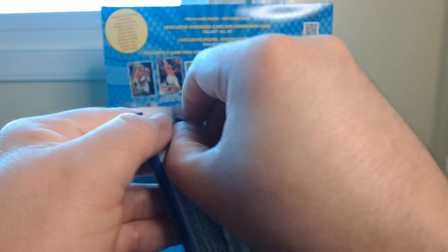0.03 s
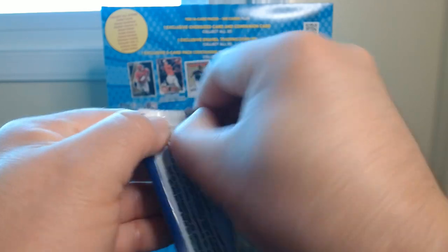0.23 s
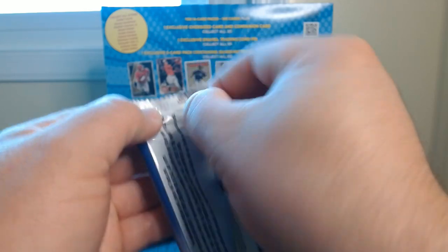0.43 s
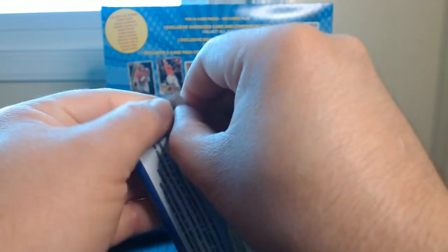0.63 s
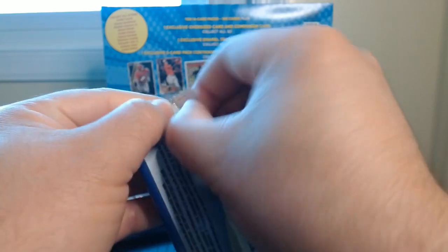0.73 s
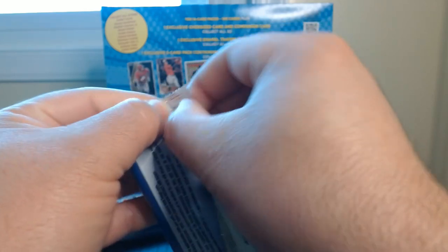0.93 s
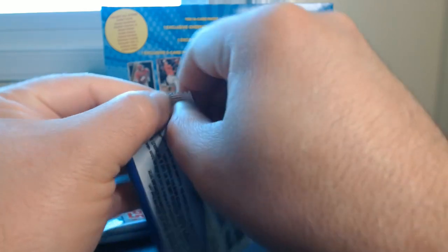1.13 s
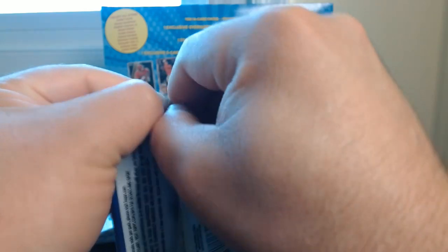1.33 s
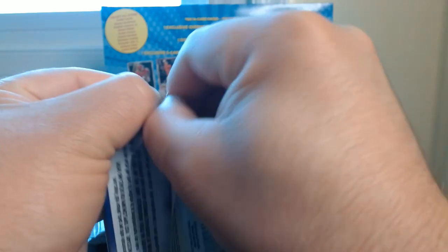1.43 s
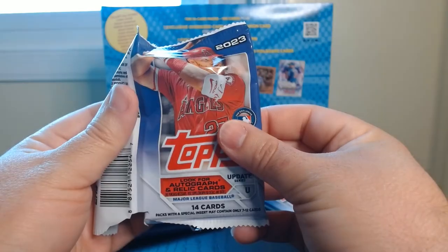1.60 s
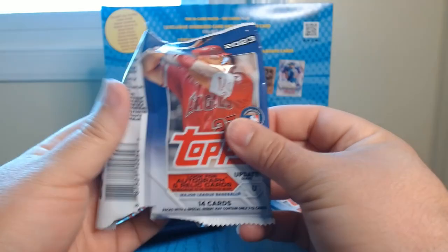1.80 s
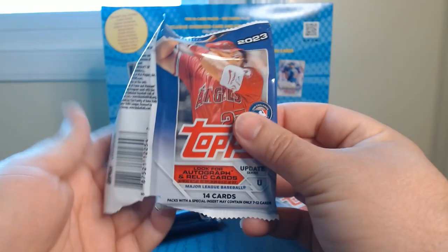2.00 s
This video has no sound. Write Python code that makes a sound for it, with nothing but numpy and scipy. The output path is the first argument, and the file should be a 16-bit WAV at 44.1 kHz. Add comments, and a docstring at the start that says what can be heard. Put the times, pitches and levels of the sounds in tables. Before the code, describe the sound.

A thin foil-plastic packet is pulled open by hand, with sharp irregular crackles, fine crinkling and tiny rips, soft low bumps, a sudden short silence, then another snap and rustle, close to the microphone in a small room.

```python
"""Two hands pull open the foil-plastic wrapper of a card pack, close to a mono microphone in a small room.
From the start the film snaps in short bursts of noise, over a crinkle of random ticks and three short rips;
low modes ring as the fingers bump the pack, most strongly late in the pull. Near 1.5 s the sound drops out
abruptly for 0.2 s. Then the opened wrapper snaps again and rustles as filtered noise, two thin sine tones
squeak, and a last crack rings. The room adds a noise tail and an echo; coloured noise rumbles below."""
import sys
import numpy as np
from scipy import signal
from scipy.fft import rfft, irfft
from scipy.io import wavfile
from scipy.ndimage import uniform_filter1d

SR = 44100
rng = np.random.default_rng(int(sys.argv[2]) if len(sys.argv) > 2 else 0)


def generate_wav(signal):
    """Clip the signal to [-1, 1] and save it as 16-bit WAV at the path in sys.argv[1]."""
    frames = np.transpose(np.atleast_2d(signal))
    scaled = np.clip(frames, -1, 1) * 32767
    pcm = np.round(scaled).astype(np.int16)
    wavfile.write(sys.argv[1], SR, pcm)


N = 90537
TIME = np.arange(N) / SR


def amp(db):
    """Decibels to gain."""
    return 10 ** (np.asarray(db) / 20)


def unit(x):
    """Scale to rms 1."""
    return x / np.sqrt(np.mean(x ** 2) + 1e-30)


def gain_over_time(points):
    """Gain over time, interpolated in dB from (s, dB) points."""
    seconds, db = np.array(points).T
    return amp(np.interp(TIME, seconds, db))


def at_hz(points, hz):
    """Read (Hz, value) points on a log-frequency axis."""
    point_hz, values = np.array(points).T
    return np.interp(np.log(np.maximum(hz, 1)), np.log(point_hz), values)


def colour(x, points):
    """Filter by (Hz, dB) points."""
    size = 2 * len(x)
    gain = amp(at_hz(points, np.fft.rfftfreq(size, 1 / SR)))
    return irfft(rfft(x, size) * gain)[:len(x)]


def above(f, edge_hz, order=14):
    """Gain of a steep high-pass."""
    ratio = (f / edge_hz) ** order
    return np.sqrt(ratio / (1 + ratio))


def decay(t, t60):
    """Exponential decay by 60 dB in t60 seconds."""
    return np.exp(-np.log(1000) * t / t60)


LOW_EDGE_HZ, BODY_EDGE_HZ, TREBLE_EDGE_HZ = 1910, 3720, 7360  # splits into low push, body, ring, edge
SNAP_TRIM_DB, BODY_TRIM_DB, EDGE_TRIM_DB = -27, 0.5, 0.5  # added to the levels in the table of snaps
LOW_DB = -5.5  # low push of a snap, added to its tabled body level
SNAP_RISE_S, SNAP_FALL_S, EDGE_LEAD_S = 0.0011, 0.0022, 0.0007  # the edge cracks first, then the sheet rings
SNAP_ROUGHNESS = 0.61  # unevenness of the fractures within a snap
RING_WIDTH_HZ, RING_DB = 1300, 6
# Colour of the film, heard close up. Each row: frequency in Hz, gain in dB.
FILM_COLOUR = [(40, -8), (280, -9), (600, -8.5), (950, -9.5), (1400, -6.5), (1950, -3), (2500, -4.5),
               (3600, 1), (6000, -0.5), (10000, -0.5), (16000, -2)]
# Snaps of the film. Each row: time in seconds, ring level in dB before the trim, ring pitch in Hz,
# body against ring in dB before its trim, treble edge against ring in dB before its trim.
FILM_SNAPS = [(0.0121,-30.5,7200,-6,4), (0.0325,-42,5900,3,-11), (0.1017,-38.5,5600,1.5,7),
              (0.111,-30.5,4300,-7.5,-5), (0.1555,-26,6600,-15.5,-2), (0.1735,-34.5,5030,2.5,8),
              (0.178,-26.5,4060,-12,-9), (0.1919,-29.5,3850,-5.5,4.5), (0.2048,-25.5,4250,-17,-6),
              (0.215,-19,3520,-7.5,-14), (0.2374,-27.5,3800,-20,-26), (0.278,-32.5,5200,-1.5,1),
              (0.2911,-22,4500,-19,0.5), (0.3,-33,4430,-8,-1), (0.3054,-22.5,4600,-9,3),
              (0.3188,-50,6150,-9,15), (.396,-29,4800,-12,-6), (0.4237,-41.5,6000,-19,12),
              (0.458,-19,5400,-11.5,-0.5), (.472,-35.5,4800,2,0), (0.565,-31,4400,-6.5,5),
              (0.58,-32.5,4770,0,10), (0.582,-22.5,4140,-9.5,1), (0.698,-23,5140,-8.5,0),
              (0.7542,-37.5,4400,-10,-9), (0.767,-36,4130,-6,0), (0.838,-44,5100,-8.5,-7),
              (0.9137,-41,6500,-9.5,6), (0.981,-31,4200,-6.5,0.5), (0.9867,-27,6700,-22.5,0),
              (0.9994,-51,6200,-18,18), (1.0301,-34.5,5100,-21,0), (1.1878,-58.5,6400,-10,13),
              (1.215,-62,5730,-3,13.5), (1.236,-59.5,6500,-8.5,8.5), (1.2676,-42.5,6000,-8,10),
              (1.316,-29.5,5500,-14,7.5), (1.3781,-33,5600,-9,4), (1.3975,-39.5,6500,-6,15),
              (1.408,-26,5430,-8,5), (1.417,-28,5230,-7,-7.5), (1.457,-33.5,5540,-20.5,-5),
              (1.4932,-20,4000,-15.5,-15), (1.4997,-21.5,4150,-8,-3.5), (1.604,-70,3430,-4.5,-10.5),
              (1.655,-74,3670,-9,-4.5), (1.702,-47,4460,-14.5,-10), (1.7194,-23.5,3570,-10,-3),
              (1.8466,-41,4050,-16,-7.5), (2.0487,-19.5,3700,-8.5,-4)]


def snaps(ringing):
    """Each buckle is a run of tiny fractures, a few milliseconds long, that rings one facet of the film."""
    size = 1024
    t = (np.arange(size) - size // 4) / SR
    f = np.fft.rfftfreq(size, 1 / SR)
    film = amp(at_hz(FILM_COLOUR, f))
    above_low, above_body, edge_band = (above(f, hz) for hz in (LOW_EDGE_HZ, BODY_EDGE_HZ, TREBLE_EDGE_HZ))
    low_band = np.sqrt(1 - above_low ** 2)
    body_band = above_low * np.sqrt(1 - above_body ** 2)
    ring_band = above_body * np.sqrt(1 - edge_band ** 2)

    def part(fractures, band, u):
        """One band of a snap, swelling and fading around u = 0."""
        burst = np.exp(-(u / np.where(u < 0, SNAP_RISE_S, SNAP_FALL_S)) ** 2)
        return unit(irfft(rfft(fractures * burst) * film * band))

    out = np.zeros(N + 2 * size)
    for when, db, ring_hz, body_db, edge_db in FILM_SNAPS:
        noise, unevenness = rng.standard_normal((2, size))
        fractures = noise * np.exp(SNAP_ROUGHNESS * unevenness)
        resonance = 1 + ringing / (1 + 2j * (f - ring_hz) / RING_WIDTH_HZ)
        snap = part(fractures, ring_band * resonance, t)
        snap += amp(body_db + BODY_TRIM_DB) * part(fractures, body_band, t)
        snap += amp(body_db + LOW_DB) * part(fractures, low_band, t)
        snap += amp(edge_db + EDGE_TRIM_DB) * part(fractures, edge_band, t + EDGE_LEAD_S)
        start = int(np.clip(when * SR, 0, N))
        # the level sets the energy of the ring, as if spread over one second
        out[start:start + size] += amp(db + SNAP_TRIM_DB) * np.sqrt(SR / size) * snap
    return out[size // 4:size // 4 + N]


RIP_FRACTURES_PER_S, RIP_RING_HZ, RIP_FLANK_DB = 12000, 4370, -18.5
# Short rips, where the seam parts fibre by fibre. Each row: start in seconds, length in seconds,
# level at the start in dB, top treble against the ring in dB.
SEAM_RIPS = [(0.3947, 0.023, -28.5, -6.5), (0.914, 0.041, -43.5, -1.5), (1.113, 0.028, -49.5, 20.5)]


def rips():
    """A dense run of tiny fractures starts at once and fades out as the rip stops."""
    out = np.zeros(N)
    for start, length, db, treble_db in SEAM_RIPS:
        fractures = (rng.random(N) < RIP_FRACTURES_PER_S / SR) * rng.standard_normal(N)
        shape = [(RIP_RING_HZ / 2, RIP_FLANK_DB), (RIP_RING_HZ, 0),
                 (2 * RIP_RING_HZ, treble_db - 3), (12000, treble_db)]
        along = np.clip((TIME - start) / length, 0, 1)
        fade = (TIME > start) * np.sqrt(1 - along ** 2)
        out += amp(db) * fade * unit(colour(fractures, shape))
    return out


SEAM_T60_S = 0.02
# Modes of the stiff seam. Each row: frequency in Hz, level in dB against the crack.
SEAM_RING_MODES = [(1954, -4), (2756, -8.5), (3450, -0.5), (4151, -3.5)]
# Hard cracks of the seam. Each row: time in seconds, level in dB.
SEAM_CRACK_TIMES = [(0.2152, -15), (2.0475, -19)]


def seam_cracks():
    """A hard crack rings the doubled film of the seam as decaying sines."""
    out = np.zeros(N)
    for when, db in SEAM_CRACK_TIMES:
        t = np.maximum(TIME - when, 0)
        modes = sum(amp(mode_db) * np.sin(2 * np.pi * hz * t) for hz, mode_db in SEAM_RING_MODES)
        out += amp(db) * modes * decay(t, SEAM_T60_S)
    return out


CRINKLE_PER_S, CRINKLE_SPREAD_DB, GRAIN_DECAY_S = 2500, 5, 0.0014
CRINKLE_FIZZ_DB = -5  # treble change from TREBLE_EDGE_HZ to the octave above
# Fine crinkle between the snaps. Each row: time in seconds, level in dB.
CRINKLE_LEVEL = [(0, -43), (.03, -43), (.09, -52), (.11, -35.5), (.15, -42.5), (.24, -39), (.37, -77),
                 (.45, -44), (.54, -64), (.68, -78), (.74, -45), (.9, -70.5), (.975, -43), (1.03, -52),
                 (1.18, -82), (1.26, -70.5), (1.33, -57.5), (1.37, -42.5), (1.41, -45), (1.47, -39.5),
                 (1.52, -59), (1.7, -82), (1.735, -45.5), (1.82, -56.5), (2.02, -73)]


def crinkle():
    """Countless small creases tick at random, each a short decaying grain of noise."""
    creases = rng.random(N) < CRINKLE_PER_S / SR
    strength = amp(CRINKLE_SPREAD_DB * np.minimum(rng.exponential(size=N), 4))
    envelope = signal.lfilter([1], [1, -np.exp(-1 / (GRAIN_DECAY_S * SR))], creases * strength)
    grains = envelope * rng.standard_normal(N)
    fizz = [(TREBLE_EDGE_HZ, 0), (2 * TREBLE_EDGE_HZ, CRINKLE_FIZZ_DB)]
    return unit(colour(colour(grains, FILM_COLOUR), fizz)) * gain_over_time(CRINKLE_LEVEL)


BUMP_RISE_S = 0.0055
# Modes of the pack. Each row: frequency in Hz, level in dB against the bump, t60 in seconds.
PACK_MODES = [(144, -0.92, 0.083), (224.8, 1, 0.087)]
# Soft bumps of the pack. Each row: time in seconds, level in dB.
PACK_BUMPS = [(0.458, -46), (0.953, -47), (1.286, -32), (1.317, -39.5), (1.489, -41)]


def bumps():
    """Soft knocks of the fingers ring two low modes of the pack."""
    out = np.zeros(N)
    for when, db in PACK_BUMPS:
        t = np.maximum(TIME - when, 0)
        rise = 1 - np.exp(-t / BUMP_RISE_S)
        for hz, mode_db, t60 in PACK_MODES:
            out += amp(db + mode_db) * rise * decay(t, t60) * np.sin(2 * np.pi * hz * t)
    return out


# Colour of the sliding wrapper. Each row: frequency in Hz, gain in dB.
RUSTLE_COLOUR = [(300, -18), (1800, -3), (2600, -6), (3800, 1), (6500, -19), (15000, -25.5)]
# Wrapper sliding over the cards. Each row: start in seconds, length in seconds, level at the peak in dB.
WRAPPER_SLIDES = [(1.586, 0.37, -78), (1.784, 0.251, -54)]


def slide():
    """A soft rustle of filtered noise swells and fades each time the wrapper shifts."""
    swell = np.zeros(N)
    for start, length, db in WRAPPER_SLIDES:
        swell += amp(db) * np.sin(np.pi * np.clip((TIME - start) / length, 0, 1))
    return swell * unit(colour(rng.standard_normal(N), RUSTLE_COLOUR))


SQUEAK_TOP_S, SQUEAK_SAG_PER_S2, SQUEAK_WAVER = 1.929, 40, 0.004  # waver: rms share of the pitch
# Tones of the sliding foil. Each row: pitch at the top in Hz, level in dB before the unsteady grip,
# length in seconds.
FOIL_TONES = [(13000, -66, .125), (10780, -69, .075)]


def squeak():
    """Two thin, unsteady tones rise and fall in pitch and level with the speed of the sliding foil."""
    t, out = TIME - SQUEAK_TOP_S, np.zeros(N)
    for hz, db, length in FOIL_TONES:
        # noise smoothed over 64 samples wavers the pitch, over 400 the level
        waver, grip = (unit(uniform_filter1d(rng.standard_normal(N), size=size)) for size in (64, 400))
        speed = 1 - SQUEAK_SAG_PER_S2 * t ** 2 + SQUEAK_WAVER * waver
        swell = np.cos(np.pi * np.clip(t / length, -0.5, 0.5)) * np.abs(1 + grip / 2)
        out += amp(db) * swell * np.sin(2 * np.pi * hz * np.cumsum(speed) / SR)
    return out


TAIL_DB, TAIL_DELAY_S, TAIL_BUILD_S = -3.5, 0.00043, 0.0018  # tail level before the colour of the room
# Decay of the small room. Each row: frequency in Hz, t60 in seconds.
ROOM_DECAY = [(200, 0.52), (3700, 0.3149), (9700, 0.25), (16000, 0.34)]
# Colour of the room. Each row: frequency in Hz, gain in dB.
ROOM_TONE = [(100, -1), (230, 0.5), (350, -7), (1200, -0.5), (1900, 0), (5000, -1), (15000, -9)]
# Early echoes. Each row: delay in seconds, level in dB before the colour of the room.
EARLY_ECHOES = [(0.0135, -13)]


def room(x):
    """A diffuse noise tail decays at its own rate in each band; a near surface adds one echo."""
    t = TIME[:SR // 2]
    noise = rfft(rng.standard_normal(len(t)))
    f = np.fft.rfftfreq(len(t), 1 / SR)
    band_hz = np.array(ROOM_DECAY)[:, 0]
    tail = np.zeros(len(t))
    for (_, t60), share in zip(ROOM_DECAY, np.eye(len(ROOM_DECAY))):
        band = at_hz(np.c_[band_hz, share], f)  # crossfades into the neighbouring bands
        tail += irfft(noise * band, len(t)) * decay(t, t60)
    tail *= np.clip((t - TAIL_DELAY_S) / TAIL_BUILD_S, 0, 1)
    response = amp(TAIL_DB) * tail / np.linalg.norm(tail)
    for lag, db in EARLY_ECHOES:
        response[int(lag * SR)] += amp(db)
    return signal.fftconvolve(x, colour(response, ROOM_TONE))[:N]


# Colour of the low rumble. Each row: frequency in Hz, gain in dB.
RUMBLE_TONE = [(20, -1), (40, 1.5), (80, -4.5), (240, -3), (320, -13), (700, -28.5), (2000, -35),
               (16000, -42.5)]


def rumble():
    """Low coloured noise of hands and room, at rms 1."""
    return unit(colour(rng.standard_normal(N), RUMBLE_TONE))


DROP_START_S, DROP_END_S, DROP_DB, DROP_FADE_S = 1.5025, 1.712, -44.5, 0.0023
FLOOR_DB = -83.5  # steady rumble that stays through the dropout
# Rumble of the handling. Each row: time in seconds, level in dB.
RUMBLE_LEVEL = [(0, -63), (.5, -57), (1.26, -62.5), (1.33, -48), (1.49, -54.5), (1.72, -57.5),
                (1.92, -62.5), (2.02, -68.5)]


def scene(count=3):
    """Direct snaps, slide, squeak and floor stay; all else drops out once. Both channels are alike."""
    # each side of the crumpled sheet radiates its own pattern toward a different wall
    walls = sum(room(snaps(0)) for _ in range(count)) / np.sqrt(count)
    tearing = crinkle() + rips() + seam_cracks()
    handling = bumps() + gain_over_time(RUMBLE_LEVEL) * rumble()
    around = walls + tearing + room(tearing) + handling
    inside_drop = np.minimum(TIME - DROP_START_S, DROP_END_S - TIME)
    dropped = np.clip(inside_drop / DROP_FADE_S, 0, 1)
    steady = slide() + squeak() + amp(FLOOR_DB) * rumble()
    mono = snaps(amp(RING_DB)) + around * amp(DROP_DB * dropped) + steady
    return np.array([mono, mono])


def record(dry):
    """The recorder cuts the top above 15.9 kHz with a steep low-pass."""
    low_pass = signal.ellip(10, 0.2, 70, 15900, fs=SR, output="sos")
    return signal.sosfilt(low_pass, dry)


dry = scene()
out = record(dry)
generate_wav(out)
```